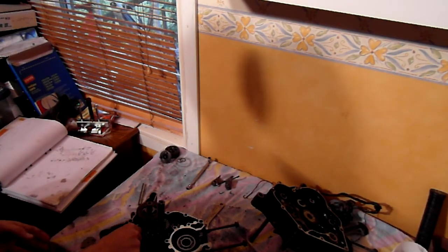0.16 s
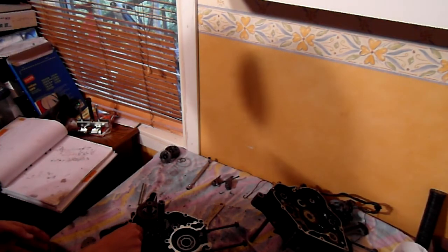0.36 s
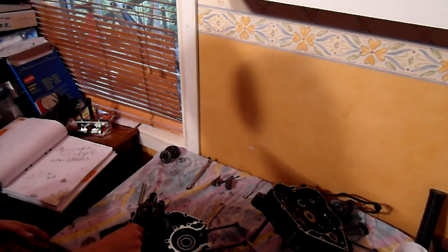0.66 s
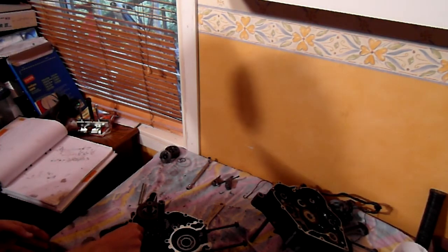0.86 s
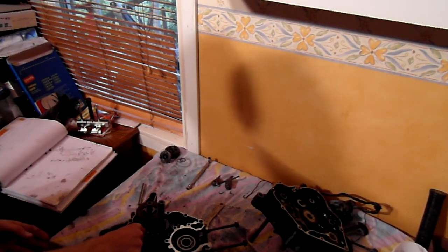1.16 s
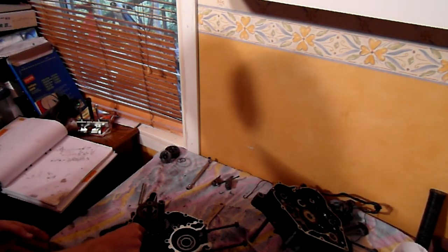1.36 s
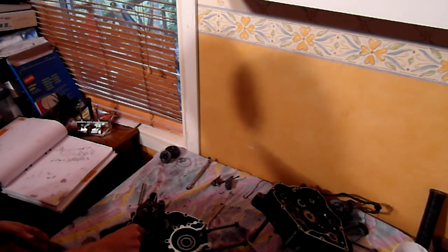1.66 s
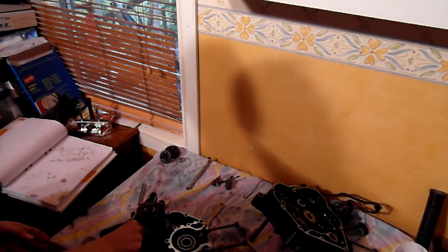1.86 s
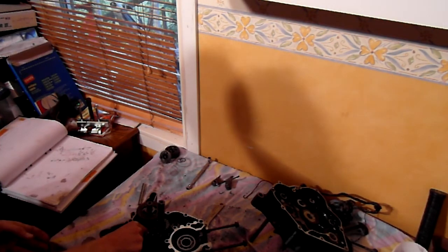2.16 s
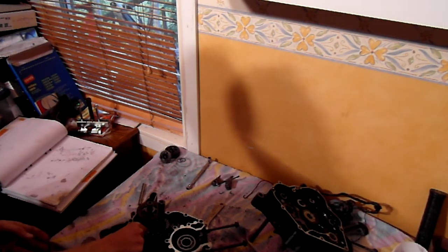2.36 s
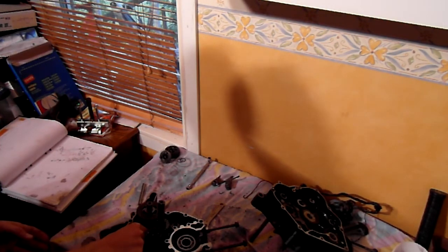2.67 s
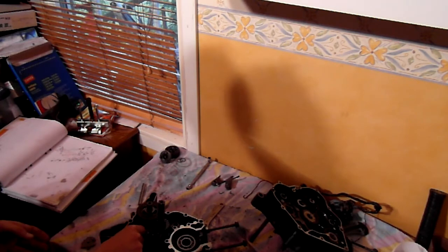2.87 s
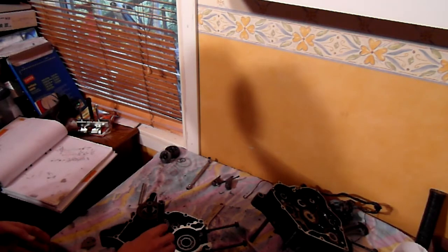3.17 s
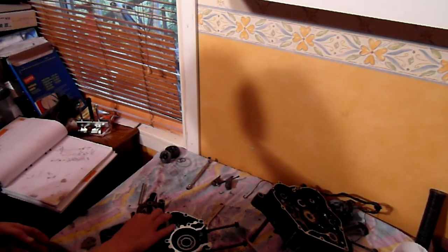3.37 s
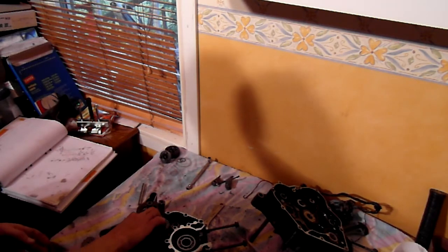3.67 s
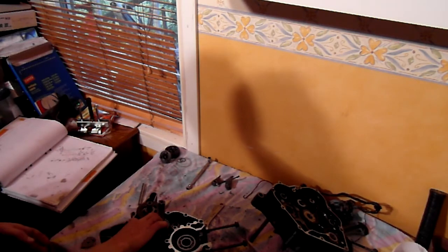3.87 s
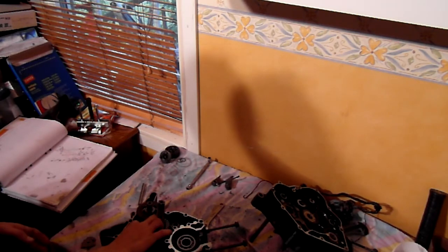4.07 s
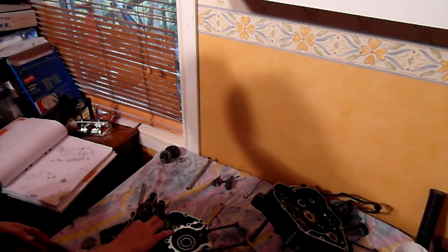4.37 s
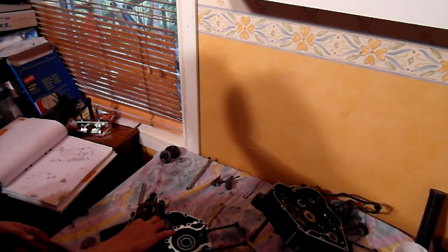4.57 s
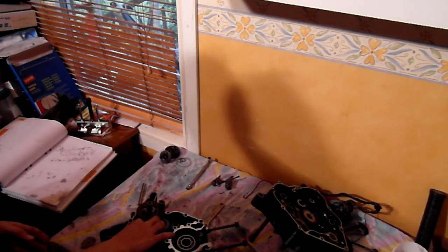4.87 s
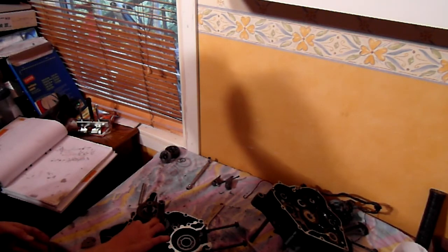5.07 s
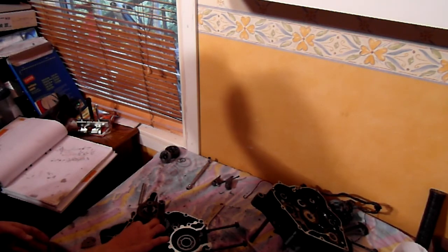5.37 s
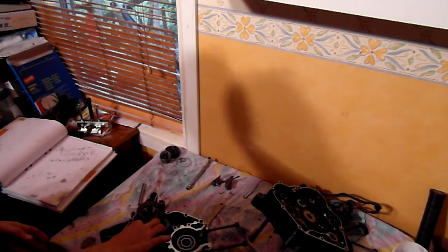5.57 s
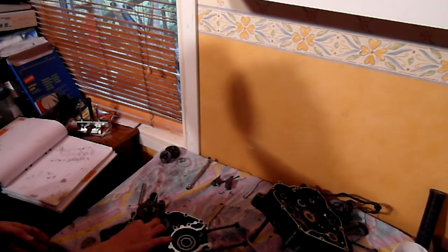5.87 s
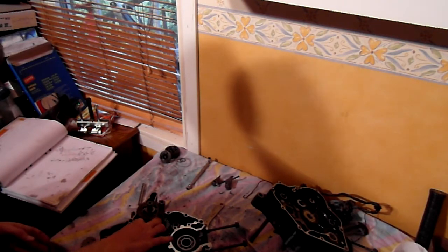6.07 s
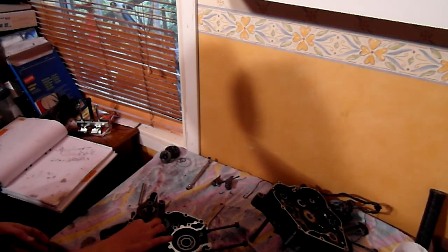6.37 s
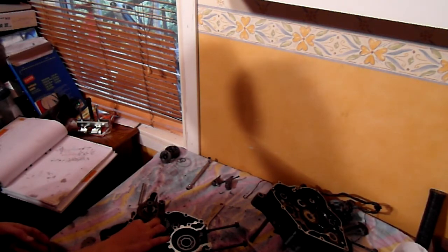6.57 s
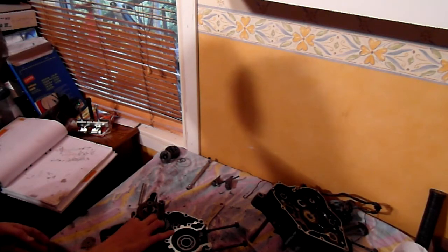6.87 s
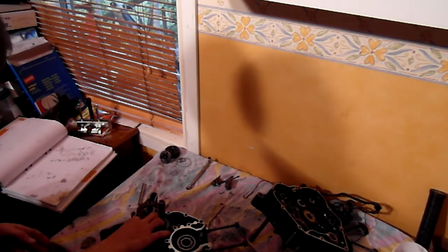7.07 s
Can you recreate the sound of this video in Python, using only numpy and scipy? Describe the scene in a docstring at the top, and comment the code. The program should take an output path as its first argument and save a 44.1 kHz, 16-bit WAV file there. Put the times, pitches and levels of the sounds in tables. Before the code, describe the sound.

Over faint steady room hiss and low hum, small metal parts tick, rattle briefly and rebound. Early contacts are quiet and isolated, with low wooden bench thuds and barely heard creaks between them. After six seconds come two bright, loud steel clacks, the first with a crackling pop on the right, then a thinner shaft click and soft knocks. Close microphones, short room reflections.

```python
"""A workbench in a small room: steel gears and shafts click against each other and knock dully on the bench.
Each click is noise in uneven micro-impacts that rings the modes of the steel, followed by a rebound.
Knocks are soft noise pushes through one broad resonance; faint creaks are narrow bands of noise.
A one-sided pressure spike hits the right microphone once. Reflections follow the parts and the bench;
room and microphone noise and a faint hum lie below."""
import sys
import numpy as np
from scipy import signal
from scipy.fft import rfft, irfft, next_fast_len
from scipy.io import wavfile

SR = 44100
rng = np.random.default_rng(int(sys.argv[2]) if len(sys.argv) > 2 else 0)


def dump_mix(stems):
    """Bounce the given channels to the path in sys.argv[1] as a 16-bit WAV at rate SR."""
    frames = np.atleast_2d(stems).T  # one column per channel
    limited = np.clip(frames, -1, 1)  # hard clip at full scale
    pcm = np.round(limited * 32767).astype(np.int16)
    wavfile.write(sys.argv[1], SR, pcm)


N = 318402   # samples in the scene
LEAD_S = .06   # from the start of a swelling sound to its top


def from_db(db):
    """dB to gain."""
    return 10 ** (np.asarray(db) / 20)


def rms_one(x):
    """Scales to rms 1."""
    return x / np.sqrt(np.mean(x ** 2) + 1e-20)


def top_one(x, span_s=0.0075):
    """Scales to rms 1 around the top of a swell, from half a span before to one span after."""
    top, span = round(LEAD_S * SR), round(span_s * SR)
    return x / np.sqrt(np.mean(x[..., top - span // 2:top + span] ** 2) + 1e-20)


def at_hz(points, hz):
    """Reads a table on a log-frequency axis."""
    table_hz, values = np.array(points).T
    return np.interp(np.log(hz), np.log(table_hz), values)


def resonance(x, hz, width_hz):
    """Two-pole resonance, gain about 1 on top."""
    radius = np.exp(-np.pi * width_hz / SR)
    zeros = [(1 - radius ** 2) / 2, 0, (radius ** 2 - 1) / 2]
    poles = [1, -2 * radius * np.cos(2 * np.pi * hz / SR), radius ** 2]
    return signal.lfilter(zeros, poles, x)


def double_resonance(x, hz, width_hz):
    """The same resonance twice in a row, for steeper skirts; the width is that of each pass."""
    return resonance(resonance(x, hz, width_hz), hz, width_hz)


def swell(rise_s, t60_s, size):
    """Envelope that grows 40 dB in rise_s towards its top, LEAD_S in, then dies 60 dB in t60_s."""
    t = np.arange(size) / SR - LEAD_S
    return from_db(np.where(t < 0, 40 * t / rise_s, -60 * t / t60_s))


def add(out, top_s, sound, level_db, pan_db):
    """Mixes a swelling sound in so that its top falls on top_s; positive pan_db makes the left louder."""
    start = round((top_s - LEAD_S) * SR)
    sound = sound[..., :N - start]
    side_db = np.array([[.5], [-.5]]) * pan_db
    out[:, start:start + sound.shape[-1]] += from_db(level_db + side_db) * sound


# spectrum of the air noise before it is levelled: hz [Hz], density_db [dB per Hz, relative]
AIR_SPECTRUM = [(12, -50), (20, -22), (42, -9), (70, -17.5), (91, -3), (125, -8.5), (316, -3), (361, -3.5),
                (391, -1), (940, -8.5), (1230, -8.5), (1480, -11.5), (11400, -18), (14800, -50),
                (22000, -120)]
# how alike left and right are: hz [Hz], likeness [correlation, 1 = identical]
AIR_LIKENESS = [(60, 0.77), (300, 0.87), (1200, 0.63), (3000, .5), (7000, 0.6), (11000, 0.1)]
AIR_DB = -63.5   # rms level


def air():
    """Steady room and microphone noise in half-octave bands, alike in the bass and apart in the treble."""
    out, edges_hz = 0, 18 * 2 ** np.arange(0, 10, .5)
    white = rng.standard_normal((2, 2, N))   # neighbouring bands get unrelated noise
    for k, (low, high) in enumerate(zip(edges_hz, edges_hz[1:])):
        band = signal.butter(2, [low, high], "band", fs=SR, output="sos")
        mid, side = signal.sosfilt(band, white[k % 2])
        centre_hz = np.sqrt(low * high)
        alike = at_hz(AIR_LIKENESS, centre_hz)
        stereo = np.sqrt(1 + alike) * mid + np.sqrt(1 - alike) * side * [[1], [-1]]
        out = out + from_db(at_hz(AIR_SPECTRUM, centre_hz)) * stereo
    return from_db(AIR_DB) * rms_one(out) * from_db([[.4], [-.4]])   # the left is slightly louder


HUM_HZ, HUM_DB = 100, -79   # rms level


def hum():
    """A faint steady sine, the same on both sides."""
    phase = 2 * np.pi * HUM_HZ * np.arange(N) / SR + rng.uniform(0, 2 * np.pi)
    return from_db(HUM_DB) * np.sqrt(2) * np.sin(phase)


ROOM_T60_S, ROOM_DB, WALL_CUT_HZ = 0.135, -8, 12800
ROOM_BEND = 1.37   # above 1 the tail falls ever faster


def room(x):
    """Dense reflections: a decaying noise response for each side, dulled by the walls."""
    t = np.arange(SR // 2) / SR
    decay = from_db(-60 * (t / ROOM_T60_S) ** ROOM_BEND) * (t > .003)   # first reflection after 3 ms
    echo = rng.standard_normal((2, len(t))) * decay
    echo = signal.lfilter(*signal.butter(1, WALL_CUT_HZ, fs=SR), echo)
    echo = echo / np.sqrt(np.sum(echo ** 2, axis=1, keepdims=True))
    return from_db(ROOM_DB) * signal.fftconvolve(x, echo, axes=1)[:, :N]


# short faint tones, as of a part creaking under load:
# middle_s [s], level_db [dB], pitch_hz [Hz], length_s [s between the points where it is down to 1/e]
CREAK_TONES = [(2.8, -76, 2100, .1), (3.855, -62.5, 592, .1), (4.995, -70, 1470, .08), (5.08, -72, 688, .3)]


def creaks(width_hz):
    """Narrow noisy tones that swell and fade."""
    out, t = np.zeros(N), np.arange(N) / SR
    for middle_s, level_db, pitch_hz, length_s in CREAK_TONES:
        tone = rms_one(double_resonance(rng.standard_normal(N), pitch_hz, width_hz))
        fade = np.exp(-(2 * (t - middle_s) / length_s) ** 4)
        out += from_db(level_db) * tone * fade
    return out


KNOCK_HZ = 500   # reference pitch: the next three settings hold for a knock here
KNOCK_RISE_S, KNOCK_T60_S, KNOCK_PAN_DB = .033, .09, 3.5
KNOCK_SLOWING = .22   # lower knocks build and die more slowly: times grow as (KNOCK_HZ / Hz) to this power
KNOCK_PAN_DB_PER_OCTAVE = 1.1   # lower knocks sit nearer the centre
# dull knocks and shudders of the bench: top_s [s], level_db [dB], pitch_hz [Hz]
BENCH_HITS = [(1.51, -69, 396), (2.385, -62, 630), (2.6, -74, 30), (2.648, -60, 640), (2.668, -48, 298),
              (2.684, -57, 500), (3.615, -65, 186), (3.64, -67.5, 118), (3.79, -66, 511), (4.735, -69, 566),
              (4.75, -71, 51), (4.8, -68, 590), (4.815, -77, 31.8), (6.097, -64, 620), (6.115, -58, 520),
              (6.14, -57, 480), (6.165, -61, 400), (6.49, -65, 29.7), (6.497, -54, 482), (6.525, -65, 368),
              (6.54, -67, 48.5), (6.785, -59.5, 471), (6.81, -65, 514), (6.936, -55.5, 546),
              (6.955, -53.5, 297), (6.938, -60, 300), (6.975, -62.5, 628), (6.979, -68.5, 99),
              (7.112, -63, 102), (7.136, -60, 111)]


def bench_knocks(sharpness, least_width_hz):
    """A soft push sets one broad resonance of the bench going."""
    out, size = np.zeros((2, N)), SR // 3
    for top_s, level_db, pitch_hz in BENCH_HITS:
        slower = (KNOCK_HZ / pitch_hz) ** KNOCK_SLOWING
        push = rng.standard_normal(size) * swell(KNOCK_RISE_S * slower, KNOCK_T60_S * slower, size)
        width_hz = max(pitch_hz / sharpness, least_width_hz)   # the lowest shudders are heavily damped
        knock = top_one(double_resonance(push, pitch_hz, width_hz), span_s=0.028)
        pan_db = KNOCK_PAN_DB + KNOCK_PAN_DB_PER_OCTAVE * np.log2(pitch_hz / KNOCK_HZ)
        add(out, top_s, knock, level_db, pan_db)
    return out


JOLT_S, JOLT_SIZE = 6.1278, 1.5   # start, and the factor on the difference of the two exponentials
JOLT_RISE_S, JOLT_DECAY_S = .000022, 0.00015   # time constants


def jolt():
    """A one-sided pressure spike at the right microphone: a sudden step that falls back in a millisecond."""
    t = np.maximum(np.arange(N) / SR - JOLT_S, 0)
    spike = np.exp(-t / JOLT_DECAY_S) - np.exp(-t / JOLT_RISE_S)
    return JOLT_SIZE * spike * [[0], [1]]


def micro_impacts(rise_s, t60_s, size, apart_db, apart_hz, uneven):
    """The rattle's driving force: noise of uneven strength, with treble that differs from side to side."""
    strength = rng.exponential(1, size) ** uneven
    both, apart = rng.standard_normal((2, size)) * strength * swell(rise_s, t60_s, size)
    # short waves leave the part unevenly, so the two microphones hear different treble
    treble = signal.lfilter(*signal.butter(1, apart_hz, "high", fs=SR), apart)
    return both + from_db(apart_db) * treble * [[1], [-1]]


# modes of the gears, before the bands are levelled: pitch_hz [Hz], width_hz [Hz], level_db [dB]
STEEL_MODES = [(1196, 60, -8), (1610, 114, 6.5), (2155, 250, -4.5), (2510, 40, 12.5), (2815, 320, 4.5),
               (3150, 220, 6), (3493, 250, 3.5), (3890, 51, 10), (4840, 110, -17.5), (5070, 70, 2.5),
               (5390, 150, 1), (5610, 330, 1), (5950, 340, -21.5), (6700, 67, -12.5), (8380, 67, -24),
               (8400, 43, -1), (8970, 140, -1), (9490, 95, -1), (9520, 150, 3), (10170, 360, 3),
               (10660, 110, 5), (11200, 126, 5), (11100, 40, -18), (11090, 170, -19), (11210, 50, -5)]


def steel_body(impacts, crack_db, mode_spread_db):
    """The impacts crack broadly and ring the steel's modes, which alternate in sign."""
    strength_db = rng.normal(0, mode_spread_db, len(STEEL_MODES))   # each contact point excites them differently
    body = from_db(crack_db) * impacts
    for k, (pitch_hz, width_hz, level_db) in enumerate(STEEL_MODES):
        mode = resonance(impacts, pitch_hz, width_hz)
        body = body + (-1) ** k * from_db(level_db + strength_db[k]) * mode
    return body


# edges of the seven bands that colour a part: edge_hz [Hz]
BAND_EDGES_HZ = [1000, 2200, 3200, 4600, 6200, 8000, 9600, 11900]


def rattle(impacts, body, band_db, rings, half_width_hz):
    """Levels the body band by band and adds single rings, all driven by the same impacts."""
    sound = 0
    for low, high, level_db in zip(BAND_EDGES_HZ, BAND_EDGES_HZ[1:], band_db):
        band = signal.butter(3, (low, high), "band", fs=SR, output="sos")
        sound = sound + from_db(level_db) * top_one(signal.sosfilt(band, body))
    for pitch_hz, ring_db in rings:
        ring = double_resonance(impacts, pitch_hz, 2 * half_width_hz)
        sound = sound + from_db(ring_db) * top_one(ring)
    return top_one(sound)


# the rebound builds quickly; the favoured ring loses weight, the part's own ring gains
REBOUND_RISE_S, FAVOURED_LOSS_DB, OWN_GAIN_DB = .016, 7, 4.5
# tone change on the rebound, where the ring near 5 kHz is damped: change_db [dB], one per band
REBOUND_TONE_DB = [.4, 1.5, -.6, -7, 1.2, -1.5, .6]
# what is struck, by name: the seven band_db [dB], then favoured_db [dB], own_hz [Hz], own_db [dB],
# half_width_hz [Hz, half the width of each ring pass], rebound_after_s [s], rebound_t60_s [s]
STRUCK_PARTS = {"gear": ((-24, -12, -24.5, -8, -23, -7.5, -4.5), (-5.5, 10270, -5, 145, .012, .058)),
                "cluster": ((-16.5, -13, -14, -7, -15, -5, -5), (-6, 11150, -7, 200, .01, .078)),
                "washer": ((-30, -28, -35, -22, -33, -17, -7), (1.5, 9200, -12, 60, .021, .035)),
                "case": ((-19, -6, -4.5, -21, -29, -13, -5), (-8, 1620, -8.5, 125, .01, .08)),
                "shaft": ((-18, -10, -4, -25, -41, -11, -6), (-2.5, 3940, -9, 280, .013, .085)),
                "pin": ((-5, -7, -9, -16, -24, -24, -24), (-5, 2750, -8, 200, .012, .06)),
                "sleeve": ((-12, -23, -26, -33, -35, -35, -35), (.9, 1570, -6, 50, .023, .055))}
# steel on steel: top_s [s], level_db [dB], part [name], favoured_hz [Hz], rise_s [s], t60_s [s],
# rebound_db [dB relative to the click], pan_db [dB, left minus right]
STEEL_CONTACTS = [(0.578, -65, "sleeve", 3070, .04, .05, -20, -1.1),
                  (0.584, -36.5, "washer", 10190, .025, .016, -20, -5),
                  (0.69, -68.5, "pin", 1790, .022, .069, -15, -4),
                  (1.062, -64.5, "cluster", 5320, .027, .056, -15, -1.1),
                  (1.534, -58.5, "pin", 2836, .0054, .07, -7, 1.1),
                  (1.724, -56, "pin", 1660, .0059, .02, -18, 1.1),
                  (1.738, -56, "sleeve", 1480, .03, .055, -2.5, 0.1),
                  (2.236, -65, "pin", 3500, .012, .041, -15, -2.1),
                  (2.373, -38.5, "case", 2850, .012, .06, -3, -1.5),
                  (2.41, -47.5, "case", 2850, .035, .045, -25, 0.1),
                  (2.646, -54.5, "case", 3940, .032, .14, -22, -.6),
                  (3.329, -58.5, "pin", 1250, .02, .04, -18, 1.1),
                  (3.782, -57.5, "pin", 1580, .0054, .047, -15, -1.1),
                  (4.727, -37.5, "gear", 5250, .008, .047, -2.5, -2.1),
                  (4.791, -36, "gear", 5260, .025, .054, -1.5, -2.1),
                  (4.803, -52, "pin", 1800, .008, .08, -15, 5),
                  (4.869, -59.5, "pin", 2700, .017, .11, -15, 1.1),
                  (5.178, -69, "pin", 1730, .05, .19, -15, -1.1),
                  (5.95, -68, "pin", 1700, .039, .17, -15, -.6),
                  (6.096, -45, "cluster", 9400, .031, .058, -15, -2.5),
                  (6.111, -33, "gear", 5400, .011, .04, -18, 0.1),
                  (6.124, -19.5, "cluster", 9250, .029, .03, -6.5, -2.5),
                  (6.348, -60, "cluster", 3390, .033, .096, -15, -1.1),
                  (6.468, -45.5, "cluster", 10100, .05, .07, -8, -4),
                  (6.488, -22.5, "cluster", 9460, .026, .024, -9, .6),
                  (6.498, -43, "pin", 1200, .02, .1, -15, -1.1),
                  (6.781, -66, "pin", 990, .01, .054, -15, 1.1),
                  (6.888, -57.5, "pin", 3700, .025, .1, -18, 0.1),
                  (6.93, -36.5, "shaft", 3570, .005, .065, -5.5, -1.5)]


def steel_clicks(mode_spread_db, crack_db, **impact_settings):
    """Each contact and its rebound rattle in uneven micro-impacts that ring the struck part."""
    out, size = np.zeros((2, N)), SR // 5

    def contact(band_db, rings, half_width_hz, rise_s, t60_s):
        impacts = micro_impacts(rise_s, t60_s, size, **impact_settings)
        body = steel_body(impacts, crack_db, mode_spread_db)
        return rattle(impacts, body, band_db, rings, half_width_hz)

    for top_s, level_db, part, favoured_hz, rise_s, t60_s, rebound_db, pan_db in STEEL_CONTACTS:
        band_db, ring_settings = STRUCK_PARTS[part]
        favoured_db, own_hz, own_db, half_width_hz, rebound_after_s, rebound_t60_s = ring_settings
        rings = [(favoured_hz, favoured_db), (own_hz, own_db)]
        click = contact(band_db, rings, half_width_hz, rise_s, t60_s)
        add(out, top_s, click, level_db, pan_db)

        rings = [(favoured_hz, favoured_db - FAVOURED_LOSS_DB), (own_hz, own_db + OWN_GAIN_DB)]
        rebound_band_db = np.add(band_db, REBOUND_TONE_DB)
        rebound = contact(rebound_band_db, rings, half_width_hz, REBOUND_RISE_S, rebound_t60_s)
        add(out, top_s + rebound_after_s, rebound, level_db + rebound_db, pan_db)
    return out


LEFT_LAG_S = 3e-5


def lag(x, lag_s):
    """Delays by a fraction of a sample's precision, as a phase slope in the spectrum."""
    size = next_fast_len(N + 64)
    delay = np.exp(-2j * np.pi * np.fft.rfftfreq(size, 1 / SR) * lag_s)
    return irfft(rfft(x, size) * delay, size)[:N]


def scene():
    """Parts and bench with their reflections over the room noise; the left microphone hears a little later."""
    background = air() + hum()
    parts = creaks(width_hz=55) + bench_knocks(sharpness=3.2, least_width_hz=65)
    parts = parts + steel_clicks(mode_spread_db=3.0, crack_db=-4, apart_db=-5, apart_hz=4000, uneven=.7)
    left, right = background + parts + room(parts) + jolt()
    return np.array([lag(left, LEFT_LAG_S), right])


OVERLOAD = 1.3   # level that the rounded peaks approach
CUTOFF_HZ = 11950


def record(dry):
    """High peaks are rounded, the treble is cut steeply."""
    rounded = OVERLOAD * np.tanh(dry / OVERLOAD)
    return signal.sosfilt(signal.cheby2(24, 70, CUTOFF_HZ, fs=SR, output="sos"), rounded)


dry = scene()
out = record(dry)
dump_mix(out)
```